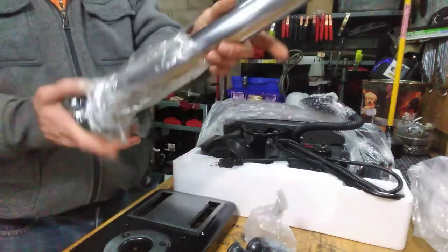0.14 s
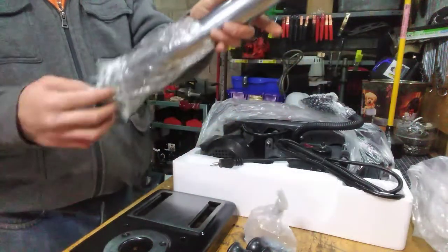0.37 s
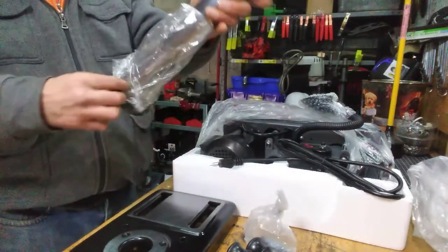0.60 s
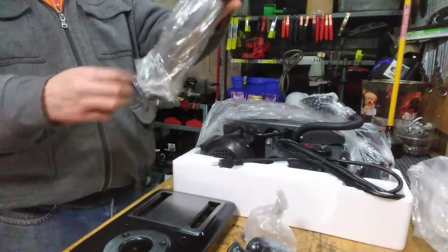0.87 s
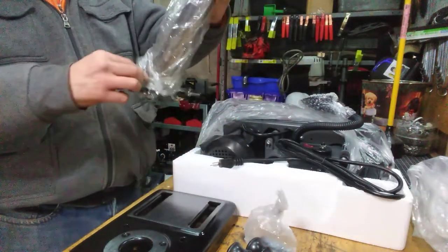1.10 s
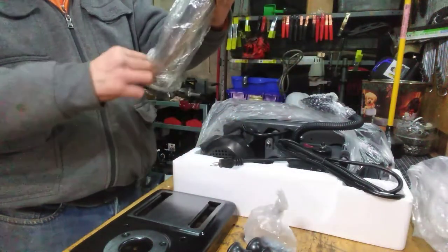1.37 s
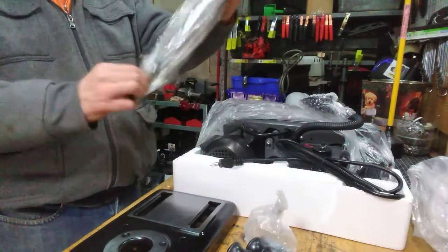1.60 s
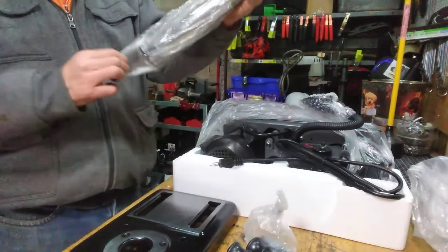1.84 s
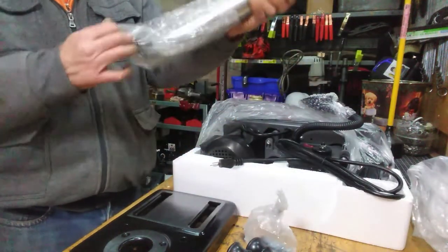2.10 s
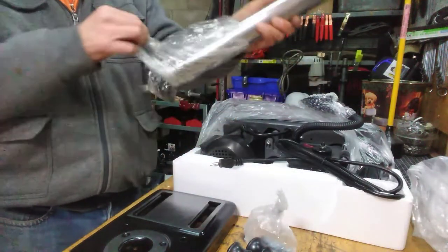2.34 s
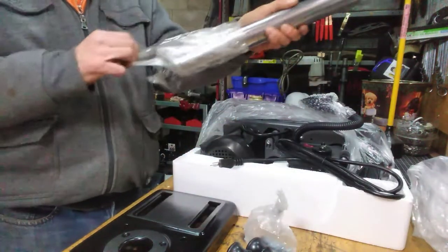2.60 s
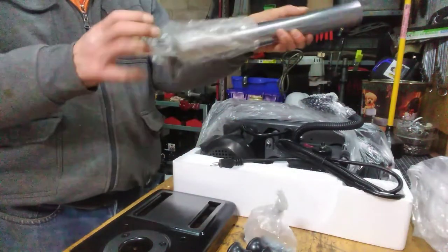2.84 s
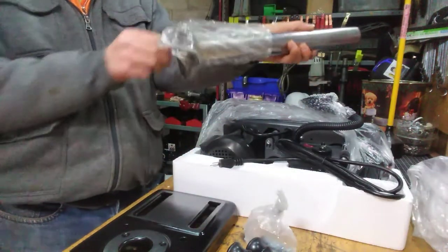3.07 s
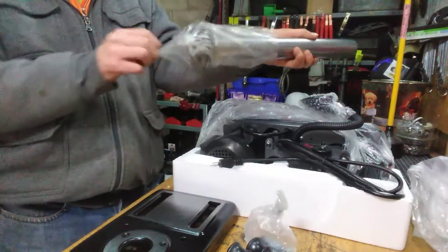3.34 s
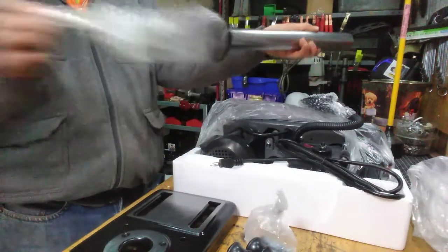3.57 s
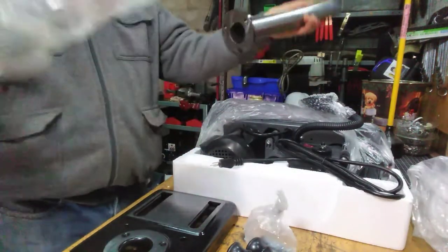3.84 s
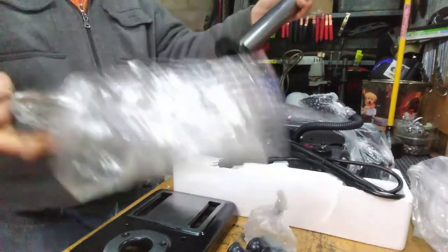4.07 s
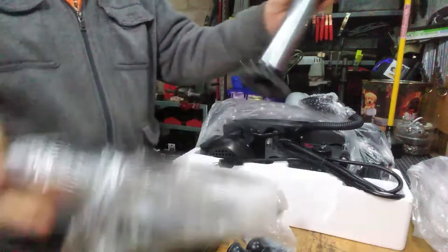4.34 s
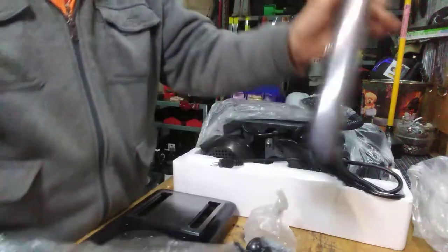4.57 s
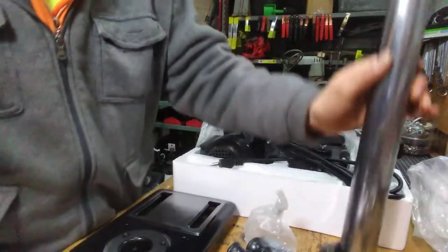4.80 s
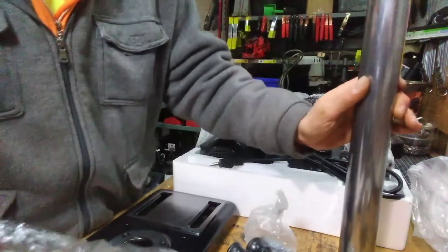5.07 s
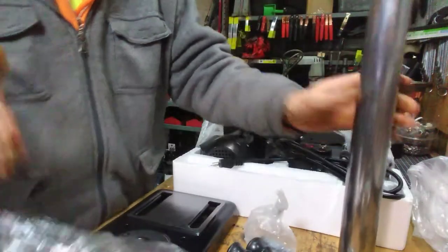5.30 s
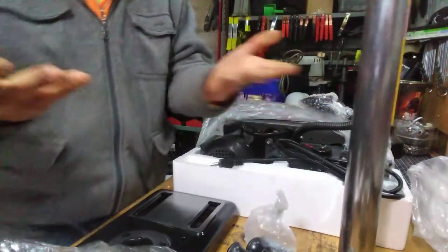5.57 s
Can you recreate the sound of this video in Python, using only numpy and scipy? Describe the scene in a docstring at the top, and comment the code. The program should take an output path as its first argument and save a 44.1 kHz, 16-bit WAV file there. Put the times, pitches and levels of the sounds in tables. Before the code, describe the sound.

A close, wide stereo view of a small garage workshop, with faint room tone and lumpy low rumble underneath. From the start, thin plastic film rustles and crackles in irregular clumps, with sharp single snaps. A very faint thin tone swells at about 0.7 to 1.1 seconds. Tugs strengthen around 1.5 to 1.7, then a brighter, longer pull builds to 2.5, a soft hollow hum from the steel tube following the rustle. The strongest pull grows from 3.3 to 3.7, the hum clearer and slightly higher, then stops quickly as the film comes free. Quieter crinkles and isolated snaps continue from 4 to 5. At 5.1 the tube lands on a wooden bench: a hard, loud knock, brief steel ring, woody boom, a longer low hollow tone and a light jingle of loose metal. Small dull bumps and film ticks close it around 5.4 to 5.6.

```python
"""Hands pick crinkly plastic wrap off a steel tube in a garage workshop: clumps of creases and lone snaps of film.
A faint thin tone comes and goes early on; with the pulls that follow, the air in the tube hums along.
As the film clears the mouth of the tube, the hum rises a little. At the end the tube is stood on a wooden bench:
wood and steel ring briefly, the air in the tube rings on for longer, and a loose metal part jingles.
Low rumble and room tone, both shaped noise, lie under all; cross-subtracting two close ports widens the image."""
import sys
import numpy as np
from scipy import signal
from scipy.fft import rfft, irfft
from scipy.io import wavfile
from scipy.ndimage import uniform_filter1d, map_coordinates

SR = 44100
rng = np.random.default_rng(int(sys.argv[2]) if len(sys.argv) > 2 else 0)


def waveform_to_disk(signal):
    """Save audio, clipped to [-1, 1], as 16-bit WAV at the path in sys.argv[1]."""
    frames = np.transpose(np.atleast_2d(signal))
    scaled = np.clip(frames, -1, 1) * 32767
    samples = np.round(scaled).astype(np.int16)
    wavfile.write(sys.argv[1], SR, samples)


def undo_db(level):
    """Turn decibels back into plain size, where 20 dB means ten times bigger."""
    steps = np.asarray(level, float) / 20
    return 10 ** steps


N = 250488   # length in samples


def rms_one(x):
    """Scale to rms 1."""
    return x / np.sqrt(np.mean(x ** 2) + 1e-20)


def in_time(rows):
    """Columns of a table of changes over time, one value per sample."""
    s, *columns = np.transpose(rows)
    return [np.interp(np.arange(N) / SR, s, c) for c in columns]


def at_hz(points):
    """A (frequency, value) table read at every FFT frequency, on a log scale."""
    hz = np.maximum(np.fft.rfftfreq(N, 1 / SR), 1)
    table_hz, values = np.array(points).T
    return np.interp(np.log(hz), np.log(table_hz), values)


# How alike a sound is at the two ports: (frequency [Hz], likeness [0-1])
PORT_LIKENESS = [(40, 0.8), (100, 0.5), (230, 0.39), (400, 1), (800, 0.68), (1500, 0.28), (3000, 0),
                 (15000, 0)]


def at_ports(pair, spectrum):
    """Colour two unrelated versions of a sound and mix them into two ports, as alike as the table says."""
    alike = np.clip(at_hz(PORT_LIKENESS), 0, 1)
    common, apart = rfft(pair) * rms_one(undo_db(at_hz(spectrum)))
    shared = np.sqrt(1 + alike) * common
    opposed = np.sqrt(1 - alike) * apart * [[1], [-1]]
    return irfft((shared + opposed) / np.sqrt(2), N)


def drift(rate_hz):
    """Smooth random wander with rms 1: white noise through two equal low-pass poles."""
    r = np.exp(-2 * np.pi * rate_hz / SR)
    noise = rng.standard_normal(N + SR)
    return rms_one(signal.lfilter([1], [1, -2 * r, r * r], noise)[SR:])   # skip the start-up second


def fade(x, t60):
    """Every impulse leaves a tail that falls 60 dB in t60 seconds."""
    return signal.lfilter([1], [1, -undo_db(-60 / (t60 * SR))], x + 1e-18)


def ring(clicks, hz, t60):
    """A unit click sets a sine ringing from height 1; it falls 60 dB in t60 seconds."""
    r, w = undo_db(-60 / (t60 * SR)), 2 * np.pi * hz / SR
    return signal.lfilter([0, np.sin(w)], [1, -2 * r * np.cos(w), r * r], clicks + 1e-18)


def swells(rows, bed):
    """Level in dB of swells that climb, hold and fall steadily in dB, their powers summed over a bed."""
    t = np.arange(N) / SR
    power = undo_db(2 * in_time(bed)[0])
    for s, db, rise_s, hold_s, fall_s in rows:
        before = (s - t) / rise_s
        after = (t - s - hold_s) / fall_s
        drop_db = 20 * np.maximum(np.maximum(before, after), 0)
        power = power + undo_db(2 * (db - drop_db))
    return 10 * np.log10(power)


def garage(x):
    """Diffuse reflections: each port hears its own dying noise tail after 6 ms, softened in the treble."""
    t60_s, level_db = 0.25, -9
    t = np.arange(round(.4 * SR)) / SR
    tail = rng.standard_normal((2, t.size)) * undo_db(-60 * t / t60_s) * (t > .006)
    tail = signal.lfilter([1], [1, -.3], tail)
    tail = tail / np.sqrt(np.sum(tail ** 2, axis=1, keepdims=True))   # energy 1
    return undo_db(level_db) * signal.fftconvolve(x, tail, axes=1)[:, :N]


# Colour of the room tone, relative: (frequency [Hz], level [dB per Hz])
ROOM_TONE_COLOUR = [(100, -1), (300, -8), (1000, -23), (4000, -27), (14000, -64)]


def room_tone():
    """Steady coloured noise."""
    return at_ports(undo_db(-59.5) * rng.standard_normal((2, N)), ROOM_TONE_COLOUR)


# Colour of the rumble, relative: (frequency [Hz], level [dB per Hz])
RUMBLE_COLOUR = [(25, -34), (42, -2), (56, 13), (68, 7.5), (80, -15), (100, -10), (140, 0), (200, -29),
                 (400, -42.5)]
# Lumps in the rumble: (time of full strength [s], level [dB], hold [s])
RUMBLE_LUMPS = [(.35, -56, .01), (.5, -48.5, .03), (.62, -52, .3), (1.17, -52, .08), (1.39, -56, .02),
                (1.58, -60, .07), (2.04, -49.5, .02), (2.26, -56, .005), (2.42, -50, .02),
                (2.61, -51, .005), (3.04, -52, .02), (3.48, -58, .005), (4.68, -55.5, .38),
                (5.41, -59, .05)]
# The rumble between the lumps: (time [s], level [dB])
RUMBLE_BED = [(0, -61), (1.0, -66), (1.7, -63), (2.0, -72), (3.4, -67), (3.95, -83), (4.05, -70),
              (5.08, -68), (5.13, -80), (5.33, -76), (5.5, -64), (5.68, -65)]


def rumble():
    """Low coloured noise in lumps, with its own quick flutter partly evened out."""
    rise_s, fall_s = .09, .13   # per 20 dB
    evenness = .6   # 0 = noise that flutters, 1 = steady swing
    lumps = [(s, db, rise_s, hold_s, fall_s) for s, db, hold_s in RUMBLE_LUMPS]
    noise = at_ports(rng.standard_normal((2, N)), RUMBLE_COLOUR)
    flutter = uniform_filter1d(np.mean(noise ** 2, axis=0), round(.03 * SR)) + .02
    even = rms_one(noise / flutter ** (evenness / 2))
    return undo_db(swells(lumps, RUMBLE_BED)) * even * undo_db([[.3], [-.3]])   # a touch louder on the left


# A faint thin tone early on: (time [s], pitch [Hz], level [dB])
THIN_TONE = [(.68, 527, -90), (.78, 545, -64), (1.0, 541, -70), (1.12, 545, -90)]


def thin_tone():
    """A near sine that swells and fades, with a slight waver in level."""
    hz, level_db = in_time(THIN_TONE)
    return undo_db(level_db + 1.5 * drift(15)) * np.sin(2 * np.pi * np.cumsum(hz) / SR)


# Jolts of a loose metal part on the bench: (time [s], level [dB])
JOLTS = [(5.0935, -44), (5.1005, -47.5), (5.232, -54), (5.243, -57), (5.2674, -56)]
# Ways the loose part rings: (frequency [Hz], level [dB], time to fall 60 dB [s])
LOOSE_PART_MODES = [(1100, -7, .1), (3560, 0, .08), (5150, -9, .07), (5850, -1, .035), (6750, -8, .035),
                    (7400, -12, .05)]


def loose_part():
    """Each jolt strikes the part's ringing modes, every mode with a random strength."""
    out, chance_db = 0, rng.normal(0, 2.5, (len(JOLTS), len(LOOSE_PART_MODES)))
    s, jolt_db = np.transpose(JOLTS)
    for (hz, level_db, t60), c in zip(LOOSE_PART_MODES, chance_db.T):
        clicks = np.zeros(N)
        clicks[(s * SR).astype(int)] = undo_db(jolt_db + level_db + c)
        out = out + ring(clicks, hz, t60)
    return out * undo_db([[-1], [1]])   # louder on the right


# Contacts with the bench: (time [s], level on the wood [dB], contact hardness [Hz], level on the tube [dB])
KNOCKS = [(5.0905, -10.5, 2430, -29), (5.1085, -24, 1200, -49), (5.174, -37, 696, -48),
          (5.198, -36, 800, -60), (5.234, -43, 1500, -70), (5.424, -30, 231, -96), (5.489, -35, 240, -90),
          (5.588, -30.5, 277, -74), (5.626, -40.5, 242, -94)]
# Ways the wooden top rings: (frequency [Hz], level [dB], time to fall 60 dB [s])
WOOD_MODES = [(97.5, -26, 0.42), (137.5, -19, 0.47), (190, -17, 0.26), (166, -18, .12), (215, -6.5, 0.13),
              (232, -9, 0.11), (262, -16, .1), (290, -14, 0.18), (328, -12.5, 0.15), (350, -15, .15),
              (396, -10, .14), (412, -12, .14), (457, -13, 0.26), (520, -17, 0.2), (542, -24, .28),
              (585, -22, 0.36), (612, -21, 0.28), (640, -27, 0.2), (694, -24, 0.25), (770, -31, 0.033),
              (893, -22.5, 0.068), (1034, -21, 0.067), (1045, -26, 0.054)]
# Ways the struck tube rings: its air at 395 Hz, long; its steel wall above, briefly:
# (frequency [Hz], level [dB], time to fall 60 dB [s])
TUBE_MODES = [(395, -14.5, 1.3), (1384, 2, 0.07), (1404, 4, 0.073), (2980, -19, 0.034), (3180, -18, .06),
              (3510, -6, 0.035)]


def bench():
    """Each contact, a click rounded by its softness, rings modes of wood and tube; a diffuse boom dies after it."""
    start = round(KNOCKS[0][0] * SR) - 10   # nothing sounds before the first contact
    length = N - start
    out = np.zeros((2, length))
    chances_db = rng.normal(0, 1, (len(KNOCKS), len(WOOD_MODES) + len(TUBE_MODES)))
    lean_db = np.array([[-1.6], [1.6]])   # the bench stands to the right
    for (s, wood_db, hard_hz, tube_db), chance_db in zip(KNOCKS, chances_db):
        click = np.eye(1, length, round(s * SR) - start)[0]
        push = signal.sosfilt(signal.butter(4, hard_hz, fs=SR, output="sos"), click + 1e-18)
        # the stiff tube feels a sharper blow
        tap = signal.sosfilt(signal.butter(2, 2 * hard_hz, fs=SR, output="sos"), click + 1e-18)
        struck = [(push, wood_db, mode) for mode in WOOD_MODES]
        struck += [(tap, tube_db, mode) for mode in TUBE_MODES]
        for k, ((force, blow_db, (hz, level_db, t60)), c) in enumerate(zip(struck, chance_db)):
            gain = (-1) ** k * undo_db(blow_db + level_db + c + lean_db)   # neighbours swing in opposition
            out += gain * ring(force, hz, t60)
        # the smack that opens each contact: one or two swings of air
        out -= undo_db(wood_db + 11.5 + lean_db) * ring(push, 470, .0065)
        boom = (fade(click, 0.37) - fade(click, .02)) * rng.standard_normal((2, length))
        boom = boom[0] + .8 * boom[1] * [[1], [-1]]
        band = signal.butter(2, [150, min(hard_hz, 750)], "band", fs=SR, output="sos")
        out += undo_db(wood_db - 6.5) * signal.sosfilt(band, boom)
    out = signal.sosfilt(signal.butter(4, 92, "high", fs=SR, output="sos"), out)
    return np.pad(out, ((0, 0), (start, 0)))


# Tugs and grabs at the film: (time of full strength [s], level [dB],
# time to rise 20 dB [s], hold [s], time to fall 20 dB [s])
TUGS = [(.33, -45, .02, .02, .15), (.42, -40.5, .11, .02, .34), (.68, -43.5, .04, .005, .11),
        (1.096, -50, .015, .09, .15), (1.2, -45, .1, .025, .055), (1.33, -46, .06, .02, .07),
        (1.45, -45, .03, .005, .13), (1.53, -39, .08, .005, .06), (1.69, -33.5, .12, .005, .14),
        (2.28, -40, .2, .005, .09), (2.47, -35.5, .22, .005, .15), (2.55, -40, .1, .06, .15),
        (2.68, -44.5, .15, .025, .1), (2.86, -44.5, .11, .1, .1), (3.268, -49.5, .025, .05, .15),
        (3.37, -39, .08, .05, .15), (3.46, -34, .13, .06, .25), (3.64, -32.5, .2, .07, .045),
        (3.86, -52, .08, .01, .3), (4.11, -56, .06, .005, .08), (4.23, -53.5, .04, .01, .05),
        (4.3, -45, .045, .005, .23), (4.63, -49.5, .02, .04, .16), (4.815, -47.5, .03, .06, .07),
        (4.98, -51.5, .07, .005, .035), (5.09, -56, .012, .005, .2), (5.24, -54.5, .04, .005, .13)]
# Light rustle of the film held in the hands between tugs: (time [s], level [dB])
HOLDING = [(0, -54), (.32, -54), (.6, -60), (.78, -56), (.9, -54.5), (.94, -63), (1.06, -72), (1.5, -62),
           (1.82, -53), (2.17, -50), (2.75, -58), (3.03, -66), (3.23, -69), (3.8, -61), (4.04, -57),
           (4.07, -70), (4.5, -63), (5.05, -72), (5.3, -65), (5.64, -69), (5.68, -85)]


def crinkle_level():
    """Strength of the crinkle in dB: tugs over the light rustle of holding."""
    return swells(TUGS, HOLDING)


# Overtones of the air in the tube: (multiple of the lowest pitch [1], level [dB])
TUBE_OVERTONES = [(1, 1), (2, -10.5), (3, -19.5), (4, -15.5)]
# How strongly the rustle drives the air, against the crinkle: (time [s], level [dB])
TUBE_DRIVE = [(1.8, -30), (2.0, -13), (2.3, -23), (2.5, -25), (2.75, -13), (3.3, -31), (3.39, -11.5),
              (3.55, -15), (3.74, -8), (4.0, -36), (4.3, -50)]


def tube_air():
    """The rustle excites the air column: narrow noise on a harmonic series, flatter while film covers the mouth."""
    covered_hz, open_hz, mouth_clears_s = 372.5, 393, (2.8, 3.35)
    width_hz = 22   # rate of the random wander that broadens each overtone
    hz = np.interp(np.arange(N) / SR, mouth_clears_s, (covered_hz, open_hz))
    phase = 2 * np.pi * np.cumsum(hz) / SR
    hum = 0
    for k, db in TUBE_OVERTONES:
        overtone = drift(width_hz) * np.cos(k * phase) + drift(width_hz) * np.sin(k * phase)
        hum = hum + undo_db(db) * overtone
    level_db = crinkle_level() + in_time(TUBE_DRIVE)[0]
    return undo_db(level_db) * hum * undo_db([[.5], [-.5]])   # a touch louder on the left


# Colour of snaps and crinkle, relative: (frequency [Hz], level [dB per Hz])
FILM_COLOUR = [(300, -44), (700, -12.5), (1500, -3), (3000, -2), (6000, -2.5), (9000, -3.5), (12000, -6.5),
               (15000, -8.5)]


def as_film(pair):
    """Give a pair of sounds the bright colour of thin film."""
    return at_ports(pair, FILM_COLOUR)


# Single snaps of the film: (time [s], level [dB], ring pitch [Hz])
SNAPS = [(0.183, -39, 5100), (0.2718, -40, 5370), (0.3295, -32, 7500), (0.6732, -31, 3170),
         (0.876, -39, 3300), (1.0009, -40, 8900), (1.0939, -32, 1390), (1.4288, -42, 3020),
         (1.6314, -29, 2620), (1.8897, -34.5, 3300), (1.9796, -36.5, 3070), (2.3826, -30, 3000),
         (3.2395, -49, 7100), (3.2633, -38, 3320), (3.2748, -35, 3000), (3.9827, -39, 3510),
         (4.0972, -43, 1350), (4.142, -45, 5800), (4.1953, -40.5, 5170), (4.224, -39, 3000),
         (4.2788, -38, 4600), (4.481, -38, 5300), (4.6263, -34.5, 5400), (4.799, -34, 2700),
         (4.9535, -45, 1220), (5.3723, -46, 3390), (5.4651, -41.5, 5100), (5.5158, -46, 1350),
         (5.5666, -44, 2880), (5.6116, -47, 8000), (5.6381, -38, 2780)]


def snaps():
    """A broad tick, a burst in the resonance of the taut patch that let go, a hiss as the film settles."""
    burst, rings = np.zeros(N), np.zeros((2, N))
    size = 900   # samples of ringing kept
    dying = undo_db(-60 * np.arange(size) / (.015 * SR))
    for (s, level_db, hz), shake in zip(SNAPS, rng.standard_normal((len(SNAPS), 2, size))):
        at = round(s * SR)
        burst[at] = undo_db(level_db)
        tail = ring(shake * dying, hz, 18.0 / hz)   # 18 cycles to fall 60 dB
        tail = tail * np.sqrt(hz / SR) * undo_db(level_db - 14)
        rings[:, at:at + size] += tail[:, :N - at]
    tick = undo_db(-10) * (fade(burst, .011) - fade(burst, .0004))
    settle = undo_db(-17) * fade(burst, 0.1)
    return as_film((tick + settle) * rng.standard_normal((2, N)) + rings)


def grains(per_s, spread_db, t60, clump_db):
    """Creases flip at random in clumps, each a tiny noise burst that dies at once; a pair, rms 1."""
    born = rng.random(N) < per_s * undo_db(clump_db * drift(25)) / SR
    sizes = undo_db(spread_db * np.minimum(rng.exponential(1, N), 4))
    power = fade(born * sizes ** 2, t60 / 2)   # its root falls 60 dB in t60
    return rms_one(np.sqrt(power) * rng.standard_normal((2, N)))


def pops():
    """Small taut patches let go in clumps and ring a few cycles, each at one of 16 pitches; a pair, rms 1."""
    per_s, cycles = 1100, 22.0   # rate before clumping; cycles to fall 60 dB
    born = rng.random(N) < per_s * undo_db(4.0 * drift(20)) / SR
    sizes = born * undo_db(2.5 * np.minimum(rng.exponential(1, N), 4)) * rng.choice([-1, 1], N)
    pair = sizes * np.stack([np.ones(N), rng.uniform(-1.5, 1.5, N)])
    dealt = rng.integers(0, 16, N)   # which pitch each patch gets
    out = 0
    for k, hz in enumerate(np.geomspace(1000, 13000, 16)):
        out = out + ring(pair * (dealt == k), hz, cycles / hz) * hz ** .9
    return rms_one(out)


# Extra crinkle above 6 kHz, added on top: (time [s], level [dB])
EXTRA_TREBLE = [(0, -10), (1.0, -8), (2.0, -19.5), (2.8, -7.5), (3.3, -38), (4.0, -11), (4.6, -11),
                (5.2, -25), (5.6, 2)]
# Colour of the duller rustle, relative: (frequency [Hz], level [dB per Hz])
FOLDS_COLOUR = [(80, -7.5), (200, 1), (320, 4.5), (500, 3), (900, 2), (1500, -26), (3000, -44)]
# The duller rustle against the crinkle, before its swing is reduced: (time [s], level [dB])
FOLDS_LEVEL = [(0, -13), (1.0, -11), (1.6, -12), (2.0, -9), (2.4, -11.5), (2.7, -7), (3.3, -11), (3.4, -7),
               (3.65, -7), (3.75, -12), (4.4, -13), (4.8, -6), (5.68, -6)]


def film():
    """Fine crinkle, lone sharp ticks and ringing pops over a duller rustle of larger folds."""
    crinkle_db = crinkle_level()
    fine = undo_db(crinkle_db - .6) * grains(1400, spread_db=-2.5, t60=.06, clump_db=4.5)
    ticks = undo_db(crinkle_db - 8) * grains(150, spread_db=3.5, t60=.008, clump_db=4.0)
    crinkle = fine + ticks + undo_db(crinkle_db - 8.5) * pops()
    treble = signal.sosfilt(signal.butter(2, 6000, "high", fs=SR, output="sos"), crinkle)
    crinkle = crinkle + undo_db(in_time(EXTRA_TREBLE)[0]) * treble
    # the folds swing less than the crinkle: 0.2 dB less for every dB
    folds_db = crinkle_db + in_time(FOLDS_LEVEL)[0] - .2 * (crinkle_db - crinkle_db.mean())
    folds = undo_db(folds_db) * grains(250, spread_db=1.5, t60=.08, clump_db=1.0)
    return as_film(crinkle) + at_ports(folds, FOLDS_COLOUR)


def scene():
    """Everything as it reaches the two ports; the film and the tube's hum also echo in the garage."""
    background = room_tone() + rumble() + thin_tone()
    near = film() + snaps() + tube_air()
    return background + loose_part() + bench() + near + garage(near)


def top_cut(x):
    """Nothing passes above the cut-off."""
    return signal.sosfilt(signal.butter(12, 15150, fs=SR, output="sos"), x)


# Share of the other port that is subtracted, before it wavers: (frequency [Hz], share [0-1])
CROSS_SHARE = [(60, .02), (250, .3), (900, .92), (2100, .97), (3200, .92), (4200, .82), (7300, .4),
               (12000, .15)]


def record(dry):
    """From each port the other is subtracted after a slowly wandering delay, mostly mid range; both ends are cut."""
    lags = (20.8, 21.5)   # samples, into left and into right, before wandering
    other = irfft(rfft(dry)[::-1] * at_hz(CROSS_SHARE), N)
    read_at = np.arange(N) - .55 * drift(4)   # wander in samples
    late = [map_coordinates(x, [read_at - lag], order=3) for x, lag in zip(other, lags)]
    late = late * np.clip(.97 + .07 * drift(5), 0, 1.04)   # the share wavers
    wide = signal.sosfilt(signal.ellip(8, .5, 38, 14280, fs=SR, output="sos"), dry - late)   # steep low-pass
    wide = signal.sosfilt(signal.butter(6, [42, 14700], "band", fs=SR, output="sos"), wide)
    return top_cut(wide)


dry = scene()
out = record(dry)
waveform_to_disk(out)
```